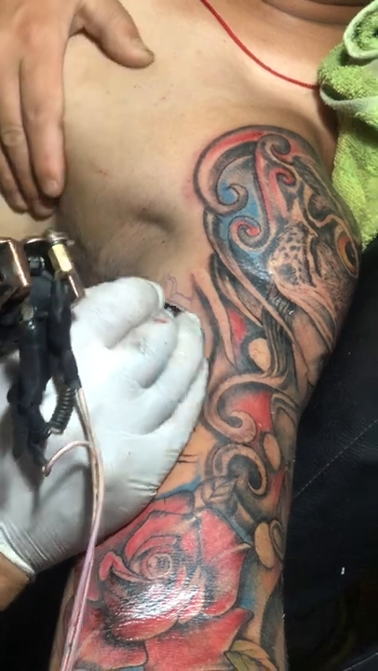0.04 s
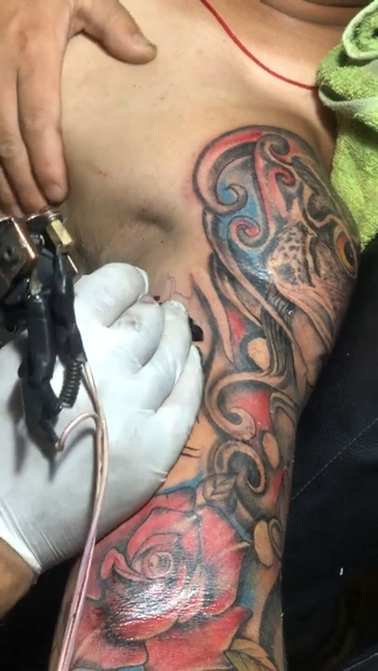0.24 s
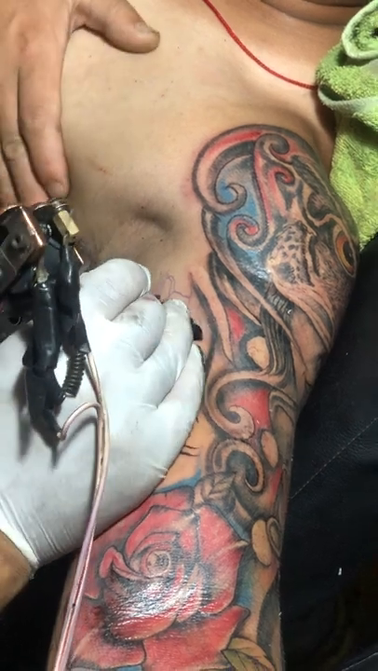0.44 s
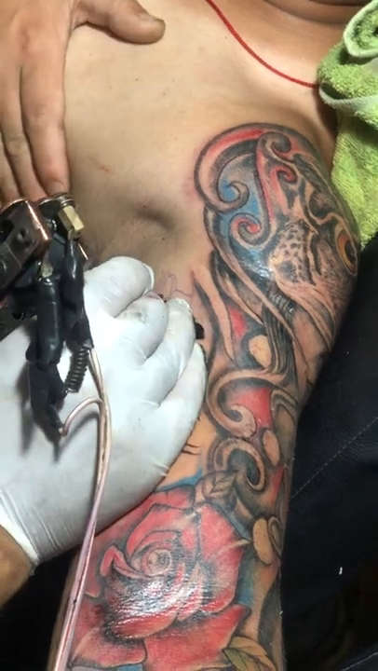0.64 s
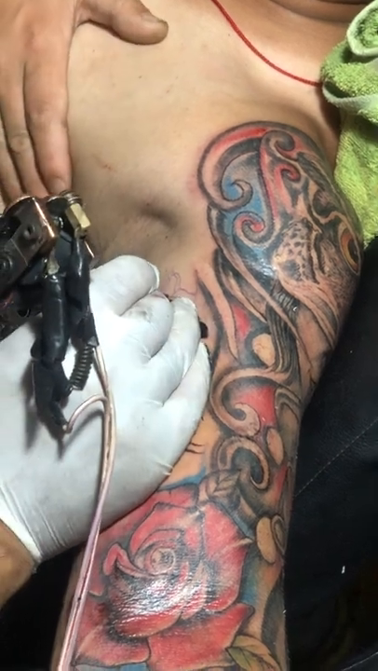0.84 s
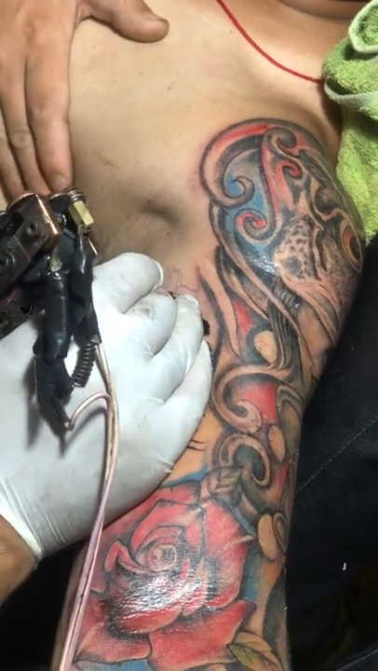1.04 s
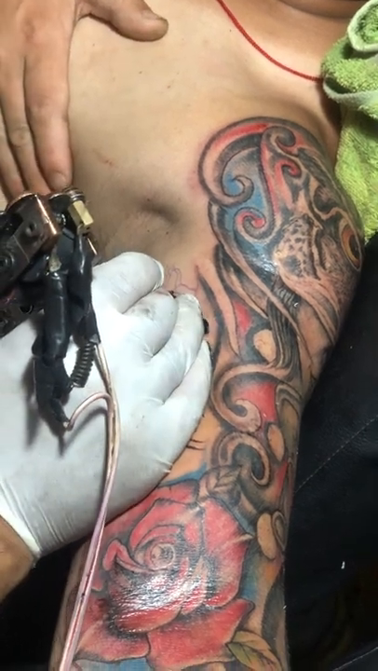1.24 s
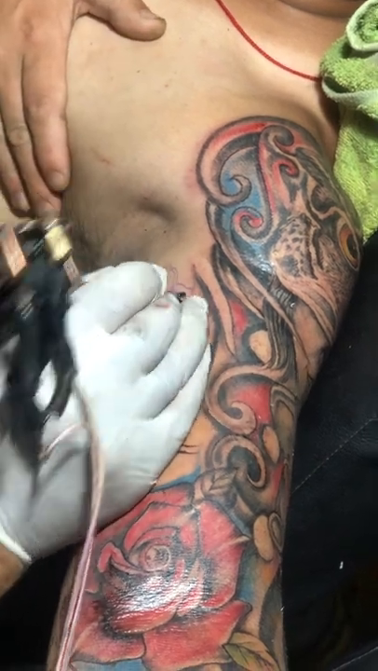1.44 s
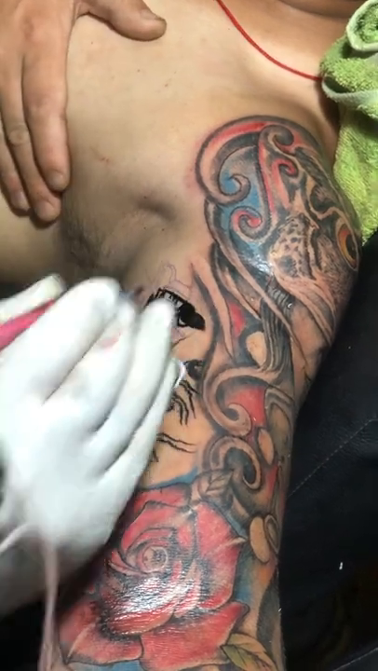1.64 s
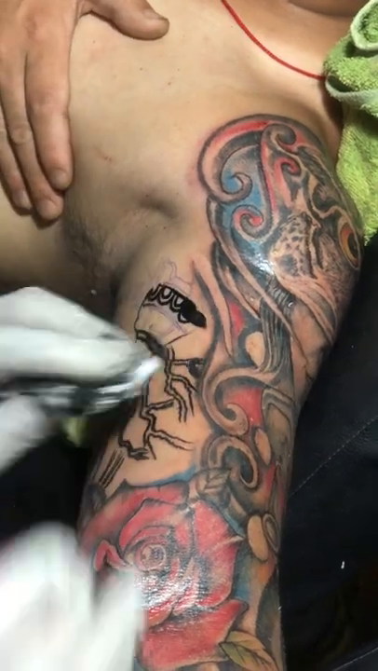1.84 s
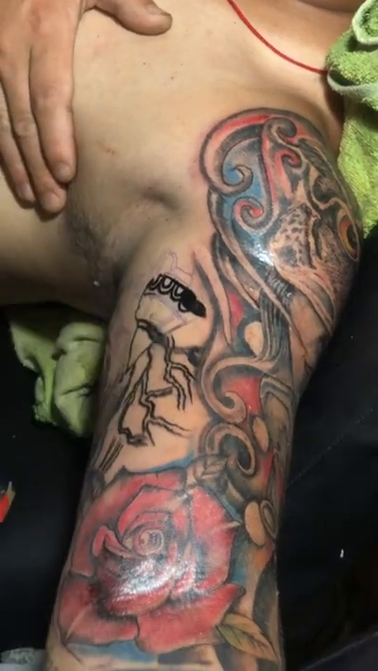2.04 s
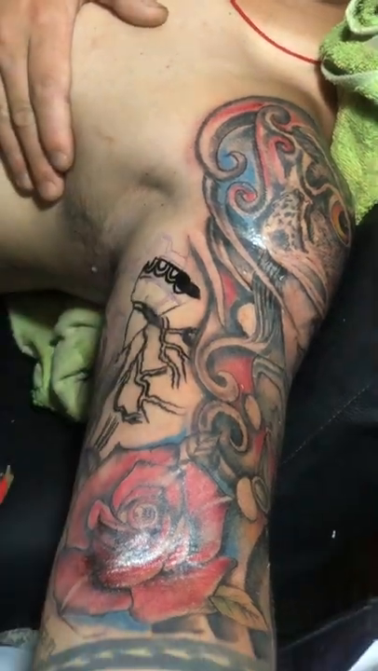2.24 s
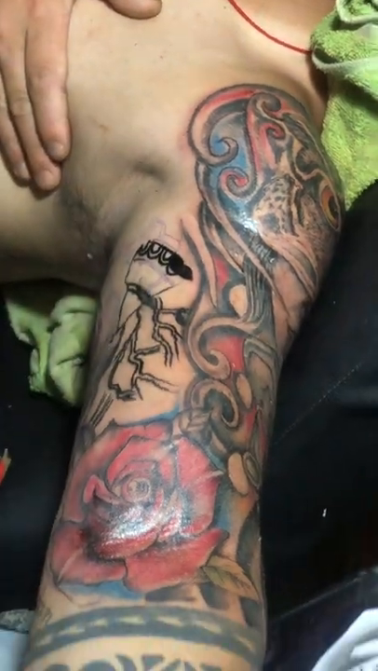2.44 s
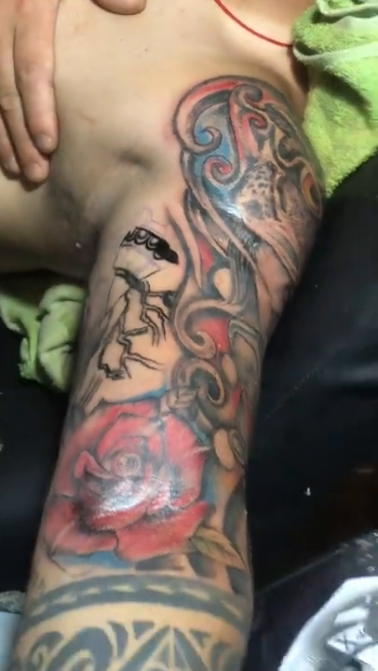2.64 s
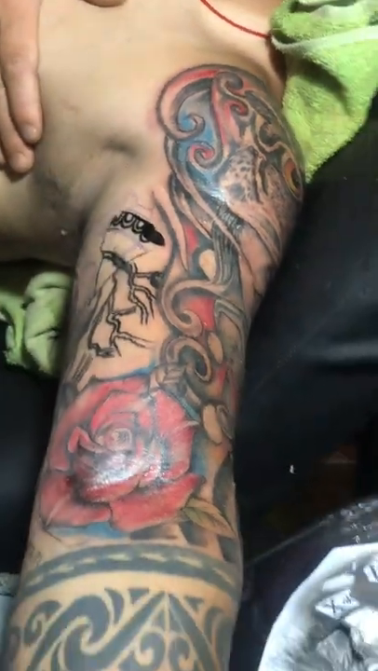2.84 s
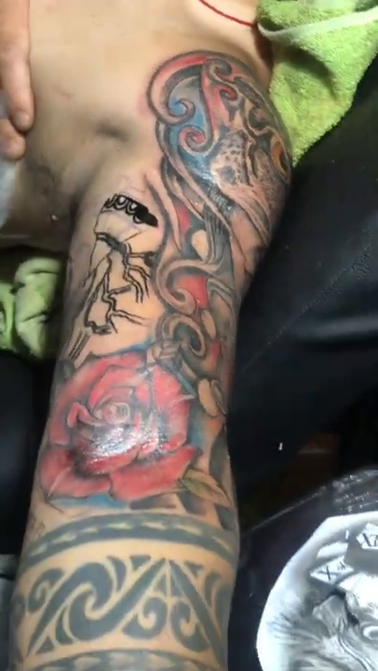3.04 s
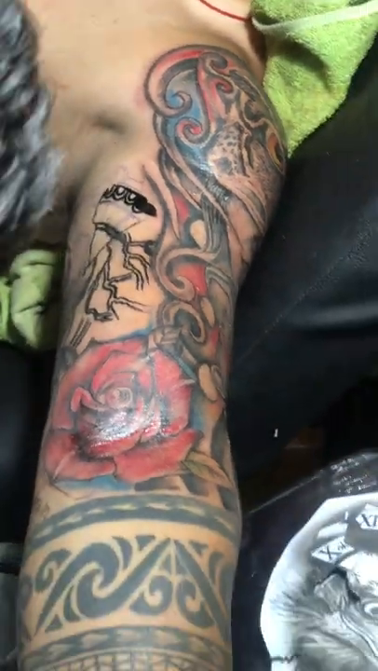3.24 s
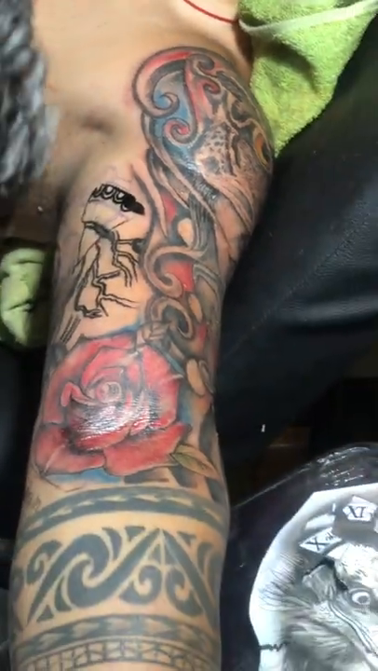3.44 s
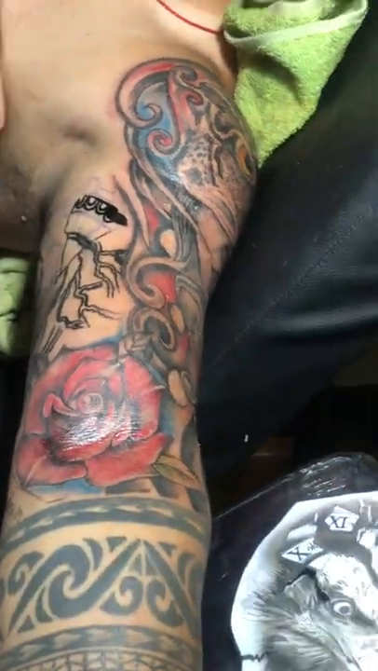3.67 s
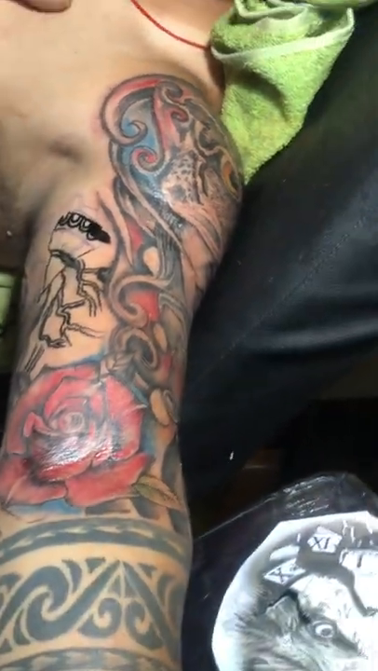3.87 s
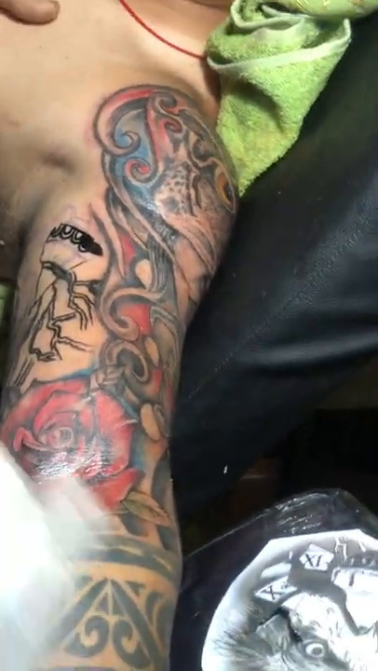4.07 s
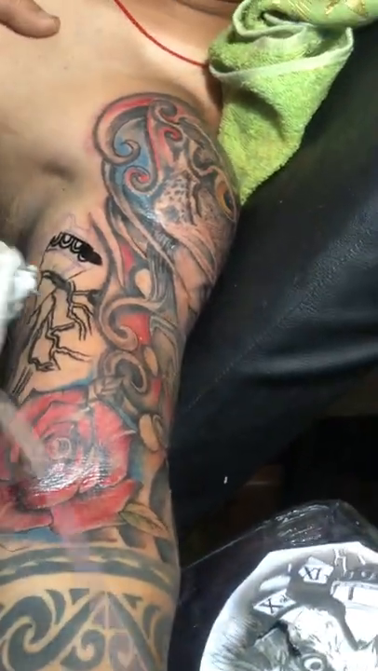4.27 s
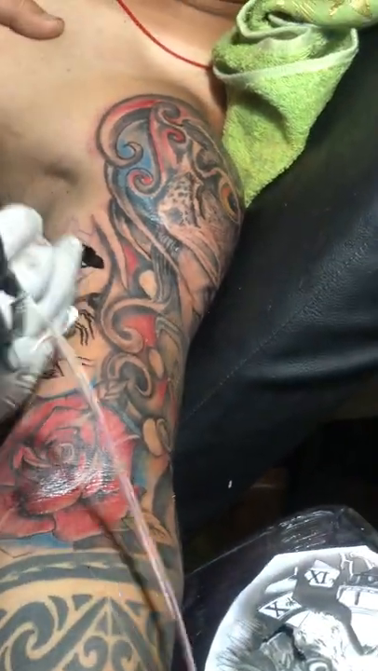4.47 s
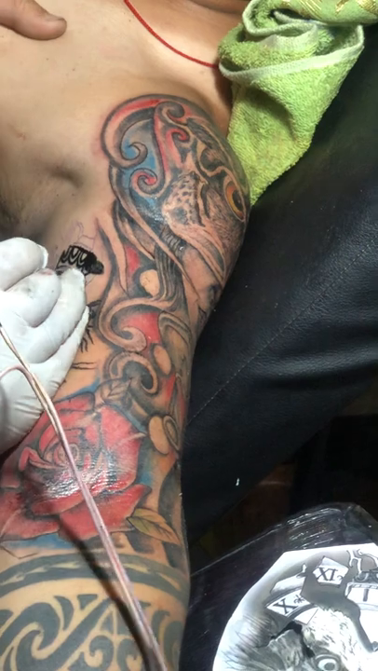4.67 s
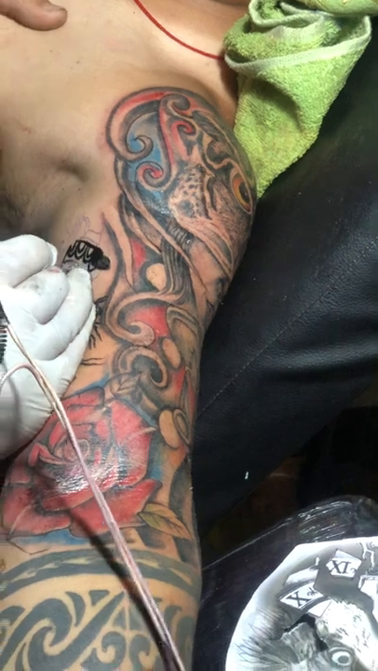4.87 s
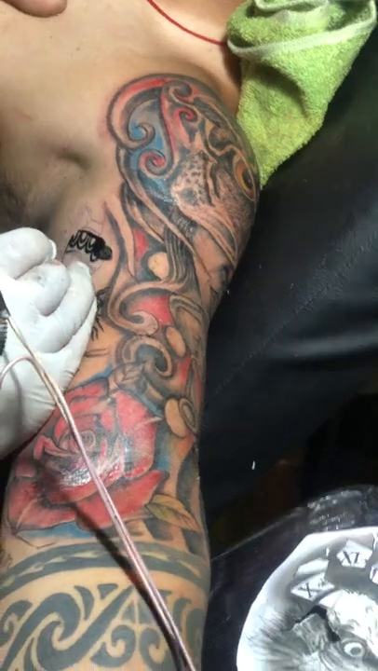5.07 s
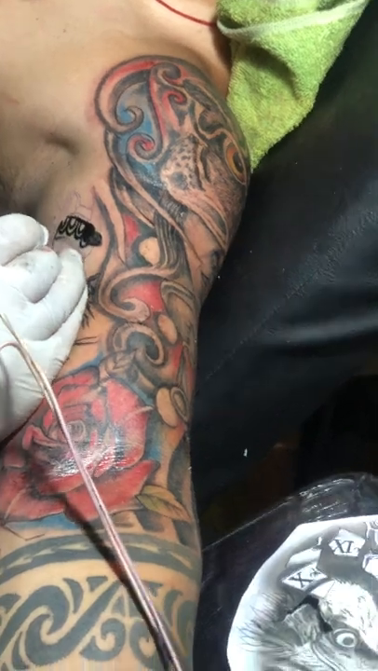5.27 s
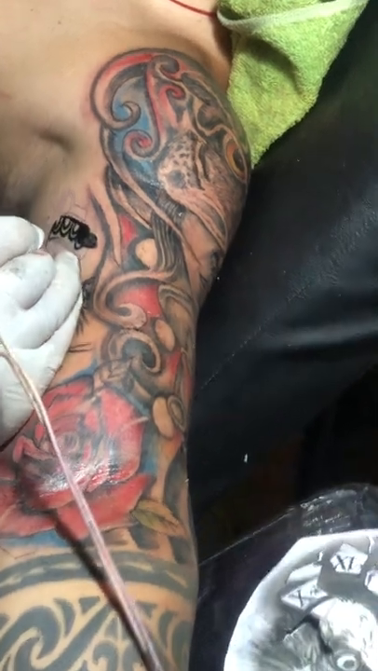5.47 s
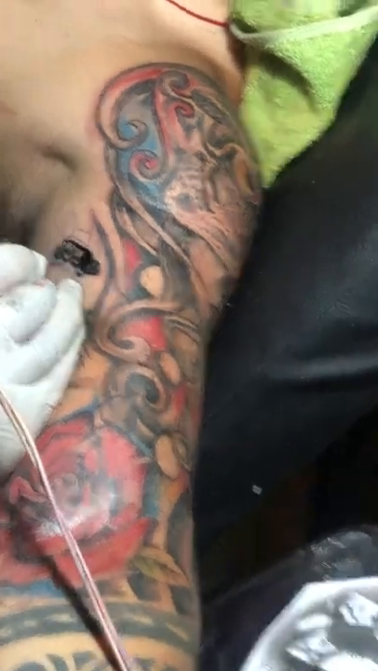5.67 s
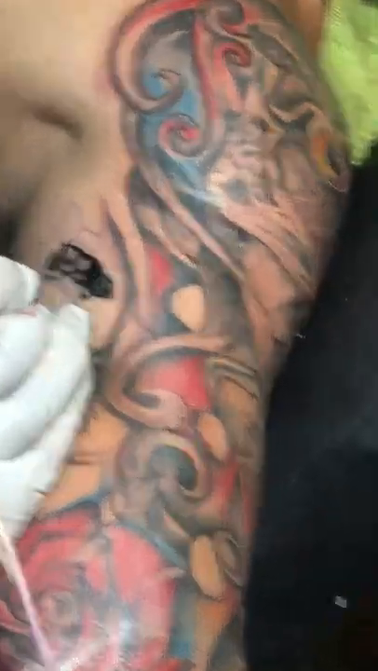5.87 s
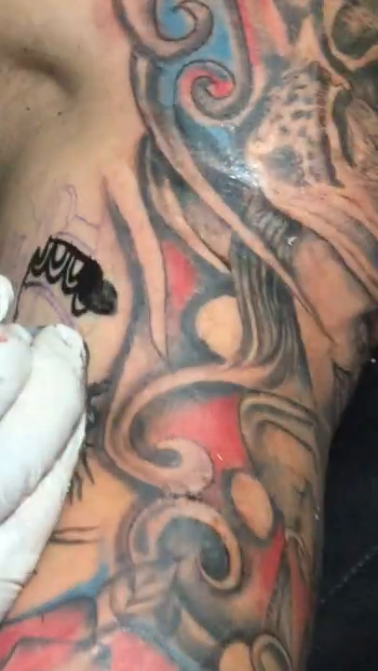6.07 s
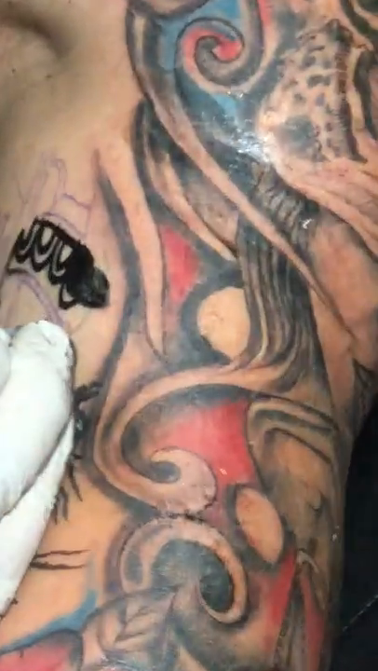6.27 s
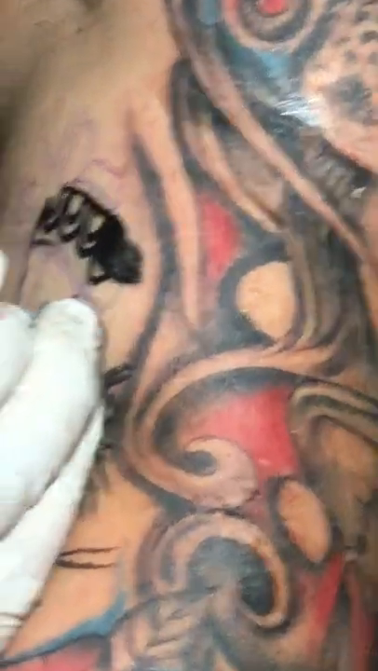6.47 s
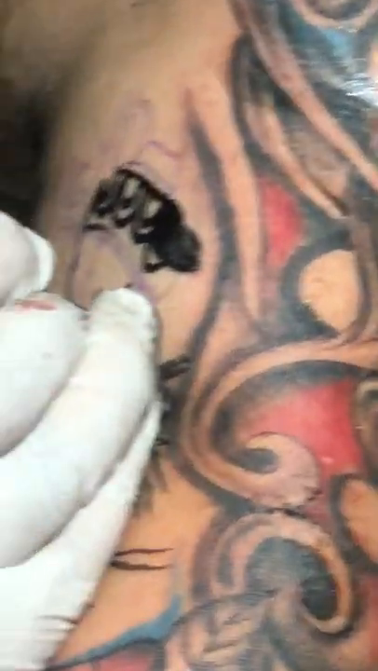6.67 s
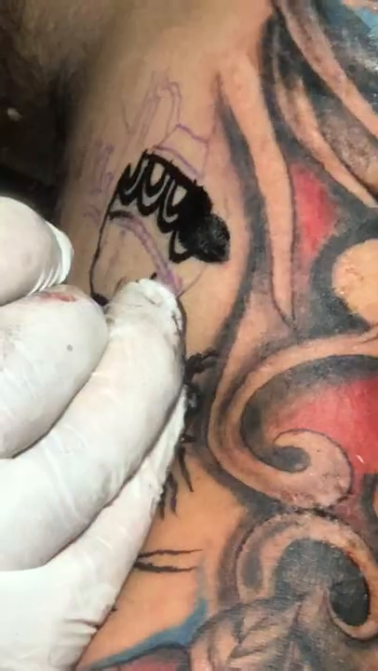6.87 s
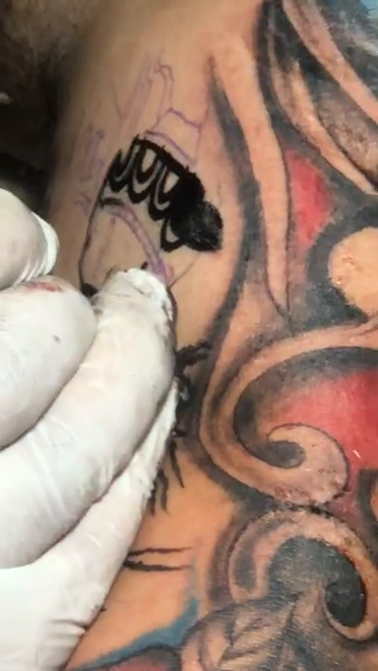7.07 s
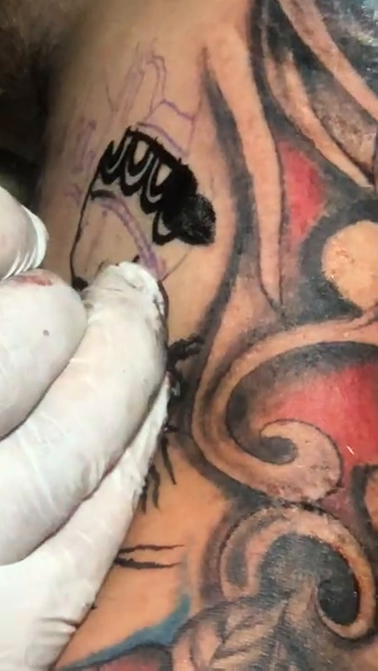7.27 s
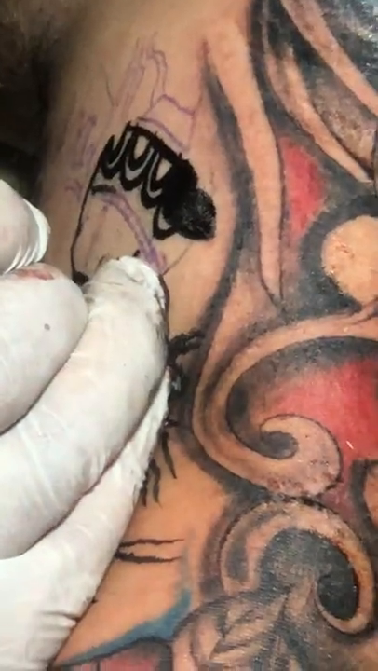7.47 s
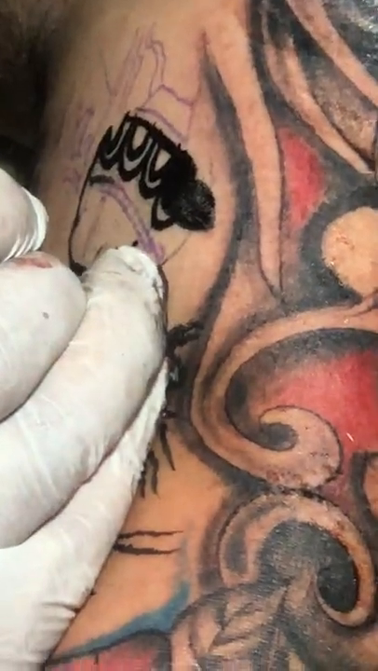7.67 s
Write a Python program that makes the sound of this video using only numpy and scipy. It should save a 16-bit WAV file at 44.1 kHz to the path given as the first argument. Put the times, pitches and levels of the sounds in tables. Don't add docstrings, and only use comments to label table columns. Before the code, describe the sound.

A raspy electric buzz of rapid steel blows, heard close on a handheld phone with a short room reflection. Three runs are split by a longer gap and a brief one. Dull low thumps from handling, tiny switch clicks, quiet hiss and droning vehicles beyond the wall lie underneath.

```python
import sys
import numpy as np
from scipy import signal
from scipy.fft import rfft, irfft, next_fast_len
from scipy.io import wavfile
from scipy.ndimage import map_coordinates

SR = 44100
rng = np.random.default_rng(int(sys.argv[2]) if len(sys.argv) > 2 else 0)


def ratio_of_db(decibels):
    return 10 ** (np.asarray(decibels, float) / 20)


def generate_wav(sig):
    pcm = np.round(np.clip(np.atleast_2d(sig).T, -1, 1) * 32767).astype(np.int16)
    wavfile.write(sys.argv[1], SR, pcm)


N = 340000

# [t/s, rate/blows per s]
SPEED = [
    [(0.009, 107.31), (0.55, 107.69), (1.119, 107.27), (1.489, 107.12)],
    [(2.341, 105.94), (2.664, 106.59), (2.986, 106.44), (3.309, 106.76), (3.631, 107.32), (3.954, 107.0)],
    [(4.347, 106.28), (4.72, 106.7), (5.094, 106.63), (5.467, 107.05), (5.841, 106.74), (6.214, 106.34),
     (6.961, 106.32), (7.707, 106.51)],
]
# [t/s, peak level/dB, f/Hz]
BUMPS = [(0.851, -31.5, 129), (0.891, -36, 131), (0.921, -35, 100), (1.557, -34, 129), (1.669, -36, 89),
         (1.715, -28, 100), (1.845, -31, 110), (1.866, -33.5, 133), (1.978, -48, 159), (2.59, -32, 89),
         (2.625, -24.5, 131), (4.889, -37, 70), (5.482, -31, 114), (5.514, -31, 115), (5.556, -35, 120),
         (5.634, -43, 100), (5.993, -42, 109), (6.025, -29, 91), (6.064, -31, 108), (6.255, -32, 95.5),
         (6.452, -33, 100), (6.481, -33.5, 129), (6.533, -38, 100), (7.439, -32, 90.5)]
# [f/Hz, width/Hz, level/dB]
LINING = ([-56, -9, -19, -53, -22, -21, -12, -12], [(4140, 340, -1), (4730, 230, -4.5), (4810, 110, -2),
          (6000, 770, -5), (6700, 200, -14), (7300, 1000, -3.5), (7750, 170, 3), (8440, 1300, -3.5),
          (9280, 410, 5.5), (9850, 580, 0), (10800, 440, -3), (11500, 460, -7.5), (14400, 330, -11)])
RAISED = ([-20, -12, -26, -49, -19, -23.5, -11, -8.5], [(4850, 330, -2.5), (5860, 160, -4),
          (6130, 220, 3.5), (8200, 560, 0), (9500, 700, -5), (11430, 720, 2.5), (12300, 1100, 10),
          (12600, 1700, 6), (14160, 770, -2.5)])
TURNED = ([-12, -9, -37, -16.5, -14, -15, -9, -9.5], [(4640, 91, 0.5), (5620, 310, 9), (7500, 870, -10.5),
          (8580, 430, 2.5), (9300, 650, 7), (12270, 630, 6), (13600, 780, -2), (14600, 700, -1)])
SWUNG = ([-15, -6.5, -13.5, -23, -20, -32.5, -7.5, -4.5], [(4100, 180, -3), (4850, 50, 5.5),
         (5680, 650, -3), (6600, 720, 0.5), (7520, 280, 2.5), (8370, 320, 3), (9950, 660, -1.5),
         (12400, 1400, -8), (14800, 330, -1.5)])
SHADING = ([-68, -2.5, -7, -34, -18.5, -23, -8.5, -5], [(4166, 93, 7.5), (4670, 90, 7), (5260, 260, 4.5),
           (5920, 97, -7), (7290, 350, 2), (7130, 590, 4.5), (7850, 480, 4), (8970, 550, 10.5),
           (9385, 580, 10), (9710, 350, 10), (10800, 560, 0.5), (12700, 1700, -1), (14700, 900, -11)])


def unit(x):
    return x / np.sqrt(np.mean(np.abs(x) ** 2) + 1e-20)


def along(points, hz):
    f, v = np.transpose(points)
    return np.interp(np.log(hz + 1), np.log(f + 1), v)


def wobble(rate):
    knots = rng.standard_normal(int(N * rate / SR) + 4)
    return map_coordinates(knots, [np.arange(N) * rate / SR])


def noise(response):
    m = next_fast_len(N)
    colour = response(np.fft.rfftfreq(m, 1 / SR))
    return unit(irfft(rfft(rng.standard_normal(m)) * colour, m)[:N])


def causal(gain):
    cepstrum = irfft(np.log(np.abs(gain) + 1e-9))
    cepstrum[1:len(gain) - 1] *= 2
    cepstrum[len(gain):] = 0
    return np.exp(rfft(cepstrum))


def resonances(modes, hz, narrowest_hz=80, loss=.028):
    responses = []
    for k, (centre, width, db) in enumerate(modes):
        w = max(width, narrowest_hz, loss * centre)
        mode = 1j * hz * w / (centre * centre - hz * hz + 1j * hz * w)
        responses.append((-1) ** k * ratio_of_db(db) * mode)
    return responses


def machine():
    # [from t/s, to t/s]
    held = [(0, 1.5), (2.3, 2.38), (2.5, 3.05), (3.4, 3.65), (3.82, 4.0), (4.3, 4.45), (4.9, 5.2),
            (5.7, 6.1), (6.45, 7.71)]
    # [side turned to the phone, treble left by the hand/dB per octave above 8600 Hz]
    facing = [(LINING, 0.1), (SWUNG, -1.9), (RAISED, 0.1), (TURNED, 0.1), (SWUNG, .1), (SWUNG, -0.61),
              (SHADING, 0.51), (SHADING, -3.5), (SHADING, 0.1)]
    # [t/s, delay/ms, level/dB]
    arm_bounce = [(2.34, .33, -22), (2.9, .3, -22), (3.6, .36, -18), (3.72, .36, -9), (3.95, .3, -9),
                  (4.35, .52, -7), (4.62, .41, -9), (4.8, .4, -18), (5.3, .4, -24)]
    # [f/Hz, width/Hz]
    frame_modes = [(870, 150), (1075, 80), (1200, 150), (1600, 150), (1830, 150), (2130, 150), (2660, 150),
                   (3050, 250)]
    # [f/Hz, level/dB per Hz]
    steel_crack = [(500, -56), (900, -24), (2500, -11.5), (4200, -6), (6000, 1.5), (9300, -6.5),
                   (11500, -5.5), (16500, -4)]
    # [f/Hz, depth/dB]
    throb = [(1100, 1.8), (2650, -1.5), (5200, .9), (5850, 4), (6600, 1), (8500, .4), (9700, 2.7),
             (14500, .5)]
    shade_hz = 8600
    wet_from_hz = 830
    lead = SR // 2

    when, beat, db = strokes()
    chance = rng.standard_normal((len(when), 4))
    size = ratio_of_db(db + 0.38 * chance[:, 0]) * np.sqrt(SR / SPEED[0][0][1])
    hit = when + 0.00018 + 8e-6 * chance[:, 1]
    rebound = hit + .0033 + 9e-5 * np.sin(beat) + 3e-5 * chance[:, 2]
    shaken = hit + 2e-5 * chance[:, 3]
    s, delay_ms, bounce_db = np.transpose(arm_bounce)
    bounce = hit + np.interp(when, s, delay_ms) / 1000
    bounce_gain = ratio_of_db(np.interp(when, s, bounce_db, left=-40))
    paths = rng.standard_normal(SR // 70)

    out = np.zeros(N + 3 * SR)
    for k, ((frame_db, bar), shade_db) in enumerate(facing):
        this_grip = np.repeat(np.arange(len(held)) == k, 2)
        share = np.interp(when, np.ravel(held), this_grip) ** .8
        on = share > 0
        first = int(when[on][0] * SR) - 64
        m = 2 * next_fast_len(int((np.ptp(when[on]) + .8) * SR / 2))
        hz = np.fft.rfftfreq(m, 1 / SR)
        lean = along(throb, hz) * np.log(10) / 20

        def train(at, gain):
            return rfft(pulses(at[on] - first / SR, (size * share * gain)[on], m))

        def throbbing(at):
            return train(at, 1) + lean * train(at, np.cos(beat - 1.2))

        low = [(c, w, level) for (c, w), level in zip(frame_modes, frame_db)]
        crack = unit(causal(ratio_of_db(along(steel_crack, hz))))
        modes = unit(sum(resonances(low, hz) + resonances(bar, hz)))
        rings = causal(np.hypot(np.abs(modes), ratio_of_db(-7.5) * np.abs(crack)))
        blows = throbbing(hit) + ratio_of_db(-12.0) * train(rebound, 1)
        soft = 1 / (1 + 1j * hz / 11000)
        shade = causal(ratio_of_db(along([(shade_hz, 0), (2 * shade_hz, shade_db)], hz)))
        echoed = blows + soft * train(bounce, bounce_gain)
        ringing = echoed * rings * shade * spread(paths, m) * bending(hz)
        direct = ratio_of_db(-0.13) * ringing * (1 + ratio_of_db(-5) * nearby(m))
        to_walls = ratio_of_db(-11) * ringing * hz / (hz + wet_from_hz) + ratio_of_db(-4.5) * throbbing(shaken) * crack
        out[first + lead:][:m] += irfft(direct + to_walls * tail(m), m)
    return out[lead:lead + N]


def strokes():
    # [f/Hz, phase/rad, timing pull/cycles]
    ripple = (100.09, 2.83, .023)
    # [t/s, level/dB]
    nearness = [
        [(0.1, -26), (1.48, -26.5)],
        [(2.35, -27.5), (2.7, -27.5), (3.07, -28.5), (3.4, -26), (3.95, -26)],
        [(4.36, -27), (4.6, -28.5), (6.0, -27), (7.7, -27)],
    ]
    hz, phase, pull = ripple
    rows = []
    for run, (speed, near) in enumerate(zip(SPEED, nearness)):
        s, rate = np.transpose(speed)
        start = s[0] if run else -.4
        t = np.arange(start, s[-1] + .003, 1 / SR)
        turns = np.cumsum(np.interp(t, s, rate)) / SR
        turns -= np.interp(s[0], t, turns)
        beat = 2 * np.pi * (turns - hz * t) + phase
        turns += pull * np.sin(beat)
        whole_turns = np.arange(np.round(turns[0]), np.floor(turns[-1]) + 1)
        when = np.interp(whole_turns, turns, t)
        db = np.interp(when, *np.transpose(near))
        db[0] -= 7
        rows.append([when, np.interp(when, t, beat), db])
    return np.hstack(rows)


def pulses(s, size, length):
    taps = np.floor(s * SR)[:, None] + np.arange(-7, 9)
    off = taps - s[:, None] * SR
    shape = np.sinc(off) * np.cos(np.pi * off / 16) ** 2
    return np.bincount(taps.astype(int).ravel(), (size[:, None] * shape).ravel(), length)


def spread(chance, m):
    t = np.arange(len(chance)) / SR
    frame_t60, scatter_t60, scatter_db = 0.0072, 0.019, -21
    fade = ratio_of_db(-60 * t / frame_t60) + ratio_of_db(scatter_db - 60 * t / scatter_t60)
    parts = rfft(chance * fade, m)
    return parts / causal(parts)


def bending(hz):
    late_s, quick_hz = 0.001596, 8000
    delay = late_s * np.maximum(np.sqrt(quick_hz / (hz + 1000)) - 1, 0)
    return np.exp(-2j * np.pi * np.cumsum(delay) * hz[1])


def nearby(m):
    t = np.arange(SR // 100) / SR
    scatter = rng.standard_normal(len(t)) * ratio_of_db(-60 * t / .013) * (t > .0004)
    return rfft(scatter / np.linalg.norm(scatter), m)


def tail(m):
    # [f/Hz, t60/s]
    studio = [(800, 0.76), (3000, 0.44), (8000, 0.26), (15000, 0.24)]
    hz, t, z = signal.stft(rng.standard_normal(SR // 2), SR, nperseg=256)
    fade = ratio_of_db(-60 * t / along(studio, hz)[:, None])
    answer = signal.istft(z * fade, SR, nperseg=256)[1]
    return rfft(np.pad(answer / np.linalg.norm(answer), (60, 0)), m)


def bumps():
    out, t = np.zeros(N + SR), np.arange(SR // 8) / SR
    knock_s, sag = 0.013, 0.69
    snap = np.exp(-t / 0.0023) * np.sin(2 * np.pi * 380 * t)
    heave = np.exp(-t / 0.027) * np.sin(2 * np.pi * 55 * t)
    for s, db, hz in BUMPS:
        u = t / knock_s
        cycles = hz * (t + sag * knock_s * (1 - np.exp(-2.2 * u)))
        knock = np.minimum(6 * u, 1) * np.exp(-u) * np.sin(2 * np.pi * cycles)
        snap_db = -36.5 + 1.74 * (db + 33.5)
        out[round(s * SR):][:len(t)] += ratio_of_db(db) * (knock + ratio_of_db(-11.5) * heave) + ratio_of_db(snap_db) * snap
    return out[:N]


def clicks():
    # [t/s, peak level/dB, ring f/Hz, t60/s]
    ticks = [
        (2.051, -31, 6860, 0.0079),
        (2.1435, -45, 9340, .014),
        (2.333, -38, 10500, 0.004),
        (4.338, -40, 8200, .008),
    ]
    out, t = np.zeros(N + SR), np.arange(SR // 20) / SR
    for s, db, hz, t60 in ticks:
        grit = 0.58 * rng.standard_normal(len(t)) * ratio_of_db(-60 * t / 0.018)
        ring = np.sin(2 * np.pi * hz * t) + grit
        out[round(s * SR):][:len(t)] += ratio_of_db(db - 60 * t / t60) * ring
    return out[:N]


def rumble():
    # [f/Hz, level/dB per Hz]
    rumble_tone = [(12, -58), (20, -43), (54, -12), (75, -4.5), (92, -13), (140, -7.5), (180, -31),
                   (310, -120)]
    t = np.arange(N) / SR
    fumble_s, fumble_db = 0.062, -21.5
    fumble = np.sqrt(sum(ratio_of_db(2 * (db + fumble_db)) * np.exp(-((t - s) / fumble_s) ** 2) for s, db, hz in BUMPS))
    return (ratio_of_db(-54 + 1.7 * wobble(4.0)) + fumble) * noise(lambda hz: ratio_of_db(along(rumble_tone, hz)))


def drone():
    # [f/Hz, width/Hz, level/dB]
    wall_modes = [(145.4, 35, 1.5), (203.5, 27, 2.5), (306, 38, -0.5)]
    t = np.arange(N) / SR
    pass_s, pass_lasts_s, pass_db = 3.9, 1.12, 6
    level_db = -50 + pass_db * np.exp(-((t - pass_s) / pass_lasts_s) ** 4)
    return ratio_of_db(level_db + 2.0 * wobble(6)) * noise(lambda hz: sum(resonances(wall_modes, hz, narrowest_hz=15)))


def engines():
    # [start t/s, length/s, f/Hz, glide/Hz per s, level/dB]
    engine_notes = [
        (2.302, 2, 61, 2.5, -54.5),
        (2.792, 1.3, 198.4, 8.5, -56),
        (2.821, 0.31, 308.5, -2.5, -52),
        (2.898, 0.424, 286.4, 11, -51),
        (4.204, 0.95, 235.3, 3, -52.5),
        (0.65, .9, 224.8, -3.5, -51.5),
    ]
    t = np.arange(N) / SR
    out = np.zeros(N)
    for s, length, hz, glide, db in engine_notes:
        pitch = hz + glide * (t - s) + 1.84 * wobble(9.3)
        to_edge = np.minimum(t - s, s + length - t)
        swell = np.clip(to_edge / (0.083 * length), 0, 1)
        out += swell * ratio_of_db(db + 4 + 1.1 * wobble(20)) * np.sin(2 * np.pi * np.cumsum(pitch) / SR)
    return out


def room_air():
    # [f/Hz, level/dB per Hz]
    air_tone = [(150, -7), (250, 1), (800, -2), (2000, -12), (5000, -18.5), (9000, -23.5), (13000, -35),
                (15800, -54)]
    return ratio_of_db(-48 + wobble(2.83) / 2) * noise(lambda hz: ratio_of_db(along(air_tone, hz)))


def scene():
    return (machine() + bumps() + clicks() + rumble() + drone() + engines() + room_air())[None]


def band_limit(x):
    return signal.sosfilt(signal.butter(12, 16500, fs=SR, output="sos"), x)


def record(dry):
    edge = np.clip((15890 - np.fft.rfftfreq(N, 1 / SR)) / 250, 0, 1)
    mix = irfft(rfft(dry) * edge, N)
    return band_limit(mix)


dry = scene()
out = record(dry)
generate_wav(out)
```